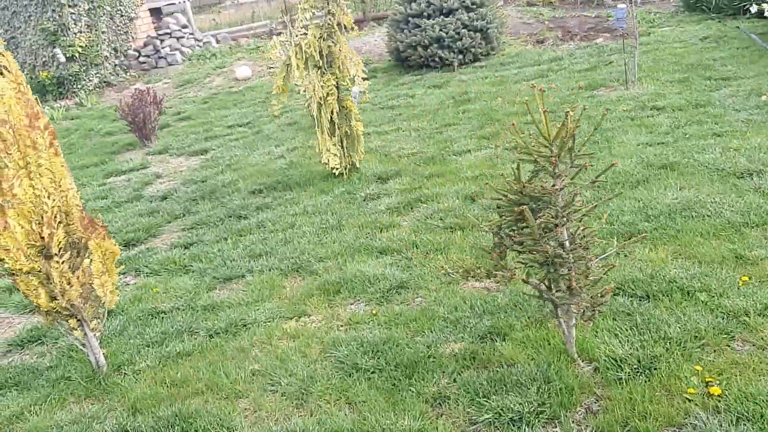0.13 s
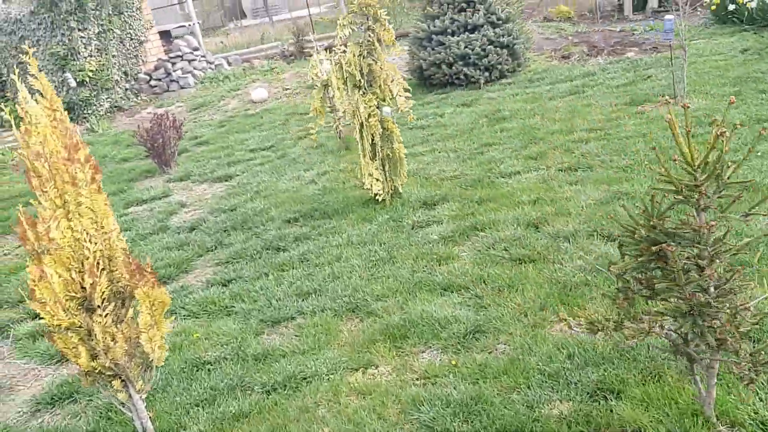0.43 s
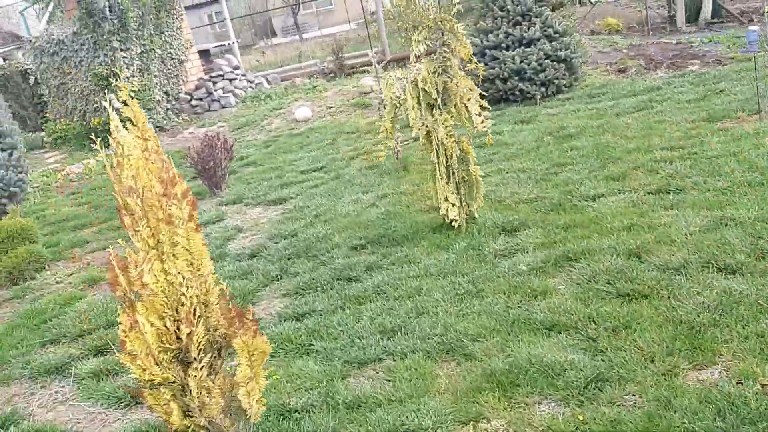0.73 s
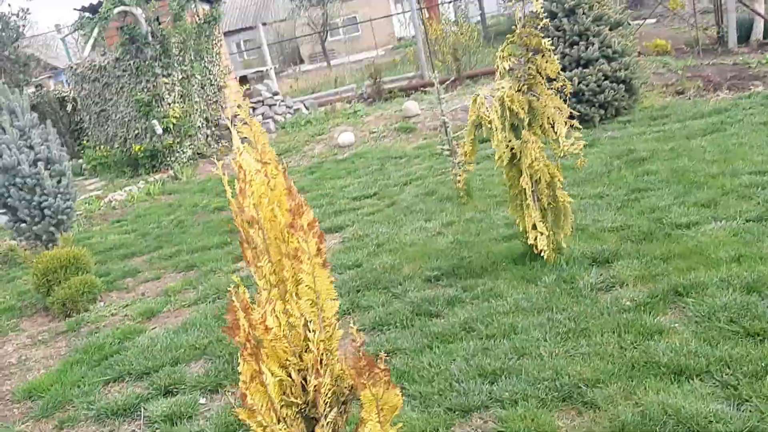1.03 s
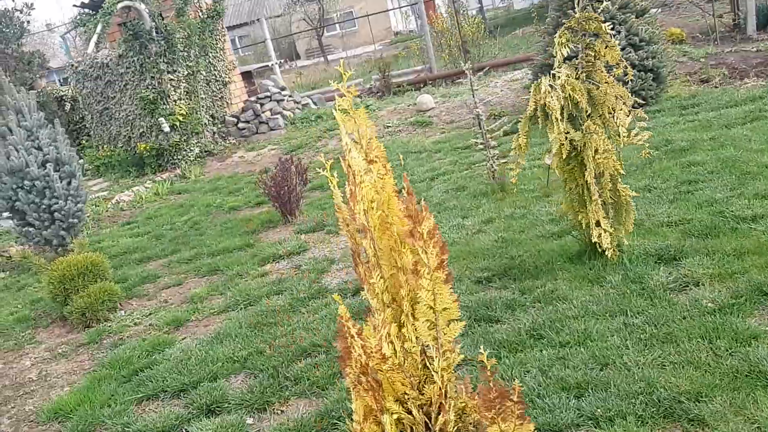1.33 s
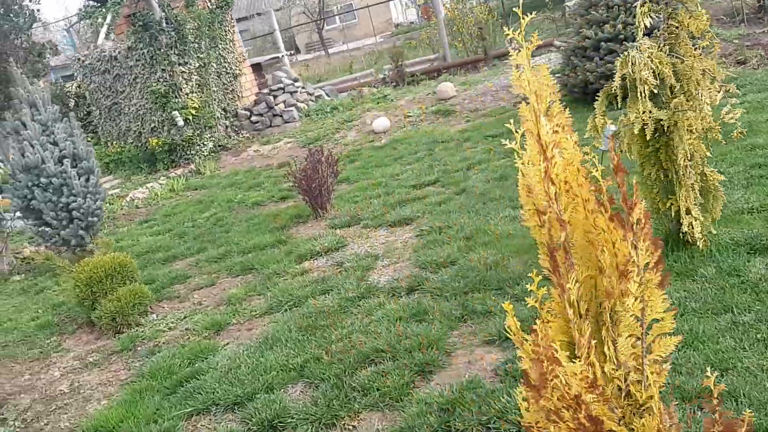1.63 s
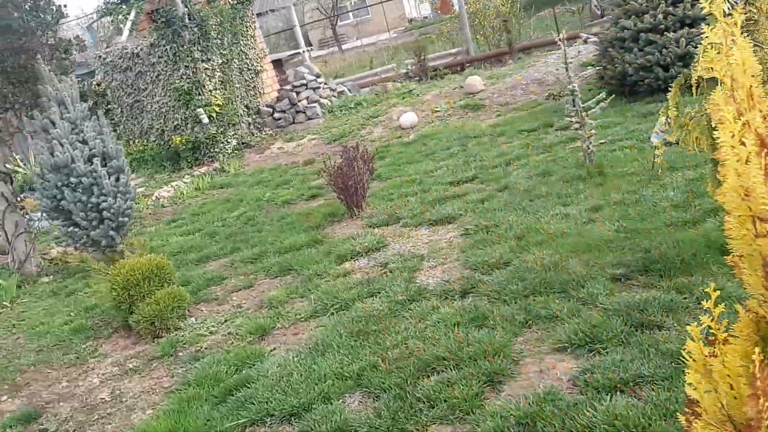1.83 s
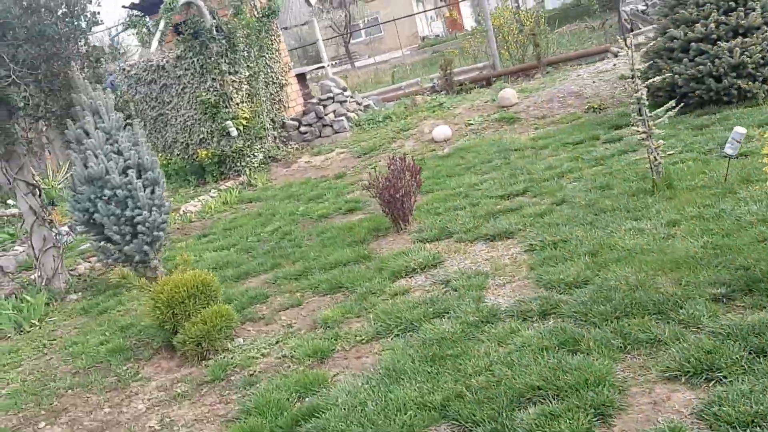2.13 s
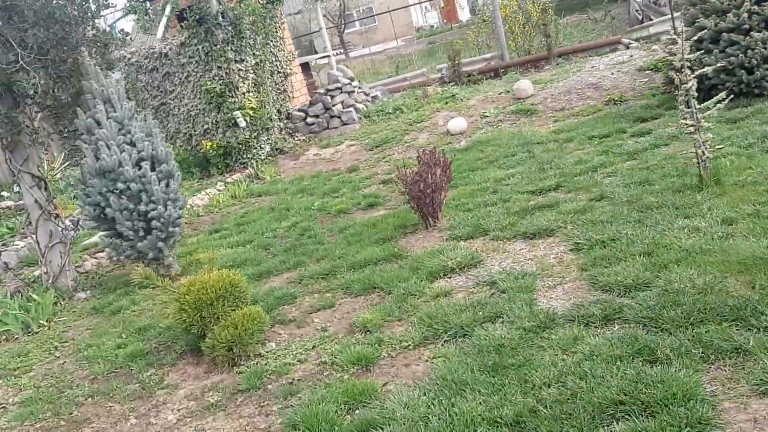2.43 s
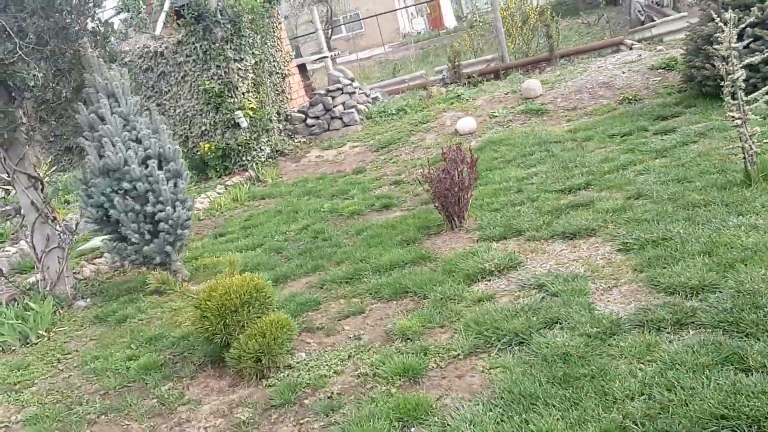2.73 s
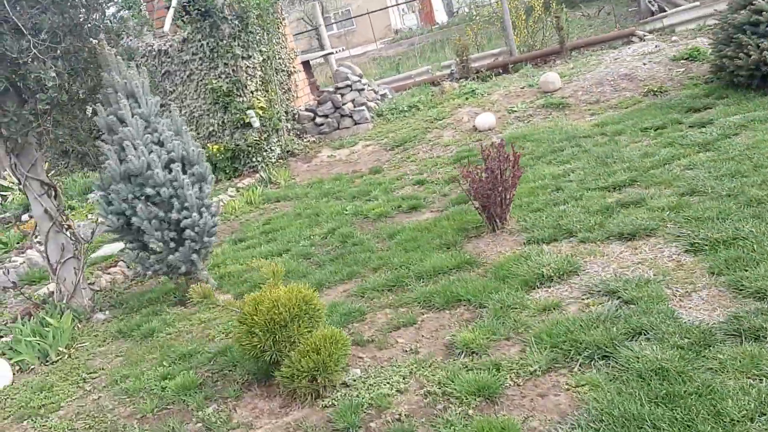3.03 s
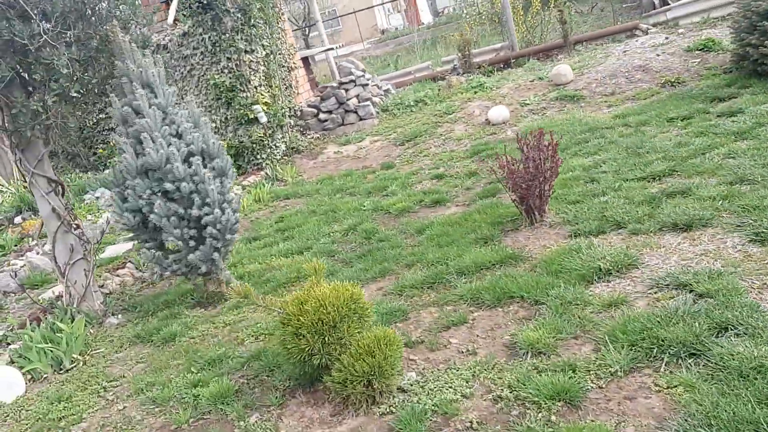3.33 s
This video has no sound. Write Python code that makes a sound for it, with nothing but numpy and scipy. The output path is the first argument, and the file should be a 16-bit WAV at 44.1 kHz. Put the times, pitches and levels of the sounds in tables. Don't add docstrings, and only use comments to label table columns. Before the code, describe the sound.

Soft irregular footsteps swish and crunch over a grassy garden lawn, with a few dry stalks snapping. A sparrow chirps sparsely across the garden, and wind buffets the handheld stereo microphone, strongest on the right.

```python
import sys
import numpy as np
from scipy import signal
from scipy.fft import rfft, irfft
from scipy.io import wavfile
from scipy.ndimage import uniform_filter1d

SR = 44100
rng = np.random.default_rng(int(sys.argv[2]) if len(sys.argv) > 2 else 0)


def store_wav(level_fs):
    pcm = np.round(np.clip(np.atleast_2d(level_fs), -1, 1) * 32767)
    wavfile.write(sys.argv[1], SR, pcm.T.astype(np.int16))


def elevation(decibels):
    levels = np.asarray(decibels, float)
    return 10 ** (levels / 20)


N = 154350


def unit(x):
    return x / np.sqrt(np.mean(x ** 2) + 1e-20)


def at_hz(points):
    hz, value = np.transpose(points)
    grid_hz = np.arange(N // 2 + 1) * SR / N
    return np.interp(np.log(grid_hz + 1), np.log(hz), value)


def colour(x, points):
    return unit(irfft(rfft(x) * elevation(at_hz(points)), N))


def drift(rate_hz):
    r = np.exp(-2 * np.pi * rate_hz / SR)
    wander = signal.lfilter([1], [1, -2 * r, r * r], rng.standard_normal(N + SR))
    return unit(wander[SR:])


def contact(rows, rise_db_s, fall_db_s):
    t, rows = np.arange(N) / SR, np.array(rows)
    start_s, hold_s, level_db = rows[:, :1], rows[:, 1:2], rows[:, 2:]
    rise = (t - start_s) * rise_db_s
    fall = (start_s + hold_s - t) * fall_db_s
    shape_db = np.minimum(0, np.minimum(rise, fall))
    return elevation(2 * level_db).T @ elevation(2 * shape_db)


def grains(power, spectrum, spread_db=2):
    born = rng.random((3, N)) < 8000 / spread_db / SR
    sizes = elevation(spread_db * np.minimum(rng.exponential(1, (3, N)), 4)) * rng.standard_normal((3, N))
    trains = np.array([colour(train, spectrum) for train in born * sizes])
    return np.sqrt(power) * elevation(0.6 * drift(29.0)) * trains


# pitch_hz [Hz], level_db [dB]
RIGHT_PORT = [(900, 2.5), (1700, 13), (3900, 8.5), (4900, -11.5), (7600, -3.5), (9400, 8), (11500, -6.5),
              (16000, -4)]
# pitch_hz [Hz], share [0-1]
SHARED = [(700, 0.9), (2500, 0.51), (8000, 0)]


def ports(shared, left, right):
    hz, left_lag_s = np.arange(N // 2 + 1) * SR / N, .00009
    late = np.exp(-2j * np.pi * hz * left_lag_s)
    share = at_hz(SHARED)
    common, own = np.sqrt(share) * rfft(shared), np.sqrt(1 - share)
    at_left = common * late + own * rfft(left)
    at_right = (common + own * rfft(right)) * elevation(at_hz(RIGHT_PORT))
    return np.array([irfft(at_left, N), irfft(at_right, N)])


# start_s [s], peak_db [dB], pitch_hz [Hz], ring [cycles]
SNAPS = [(0.1851, -40, 2360, 0.57), (0.1967, -45.5, 1430, 1.16), (0.2319, -37, 3000, 0.47),
         (0.3409, -41.5, 2930, 1.1), (.3573, -40, 2500, 0.46), (1.222, -63.5, 776, 6.7),
         (1.638, -36.5, 11000, 1.1), (1.861, -51.5, 7300, 1), (2.1172, -39.5, 8000, 0.73),
         (2.1331, -42, 8000, .8), (3.128, -51, 900, 2.1)]


def snaps():
    t, out = np.arange(N) / SR, np.zeros(N)
    for start_s, peak_db, pitch_hz, ring in SNAPS:
        cycles = np.maximum(t - start_s, 0) * pitch_hz
        swell = 1 - np.exp(-4.0 * cycles / ring)
        fade = np.exp(-cycles / ring)
        out += elevation(peak_db) * fade * swell * 1.32 * np.sin(2 * np.pi * cycles)
    return out


# full_s [s], hold_s [s], turf_db [dB], blades_db [dB],
# rustle_db [dB]
BRUSHES = [(0, 0.0082, -74.5, -76.5, -109.5), (.168, 0.096, -60.5, -56.5, -55.5),
           (.4, 0.027, -92, -66, -61), (.61, 0.056, -79.5, -76, -95.5), (.757, 0.2, -78, -63.5, -63.5),
           (1.04, .1, -75, -70, -64), (1.22, 0.021, -74, -73, -71), (1.385, 0.11, -76, -62.5, -68.5),
           (2.26, 0.19, -81, -87, -85), (1.7, 0.052, -94, -81, -73), (2.577, 0.085, -79, -64, -65.5),
           (3.132, 0.018, -62.5, -97, -85)]
# full_weight_s [s], hold_s [s], turf_db [dB], blades_db [dB], rustle_db [dB]
LANDINGS = [(.33, 0.046, -57.5, -65, -60), (.925, 0.043, -53.5, -67.5, -57),
            (1.515, 0.1, -67.5, -70.5, -59.5), (2.0, 0.066, -76, -68.5, -71.5),
            (2.135, 0.056, -59, -65.5, -60.5), (2.745, 0.0093, -59, -61.5, -55.5),
            (3.18, 0.06, -90, -63, -59.5), (3.33, 0.05, -60.5, -67, -61)]
# full_s [s], hold_s [s], level_db [dB]
SPRINGS = [(.43, 0.083, -73), (.79, 0.013, -69.5), (1.09, 0.023, -71.5), (1.99, 0.0049, -66),
           (3.17, 0.0093, -65)]
# pitch_hz [Hz], level_db [dB per Hz]
TURF = [(250, -21), (750, -1.5), (1100, -8), (1500, -14.5), (2500, -20)]
# pitch_hz [Hz], level_db [dB per Hz]
BLADES = [(700, -25), (1300, -6.5), (2000, -1.5), (2700, -2), (3800, 1.5), (5500, -4.5), (9000, -16)]
# pitch_hz [Hz], level_db [dB per Hz]
RUSTLE = [(2500, -33), (4500, 4.5), (7000, -1), (15500, -2.5)]
# pitch_hz [Hz], level_db [dB per Hz]
SPRING = [(1200, -29), (1650, -16.5), (1950, -6.5), (2350, -16.5), (3200, -23)]


def grass():
    land_rise_db_s, land_fall_db_s, rustle_swell_s = 325, 242, 0.039
    landings = contact(LANDINGS, land_rise_db_s, land_fall_db_s)
    turf, blades, rustle = contact(BRUSHES, 1514, 117) + landings
    keep = np.exp(-1 / (rustle_swell_s * SR))
    rustle = np.minimum(signal.lfilter([1 - keep], [1, -keep], rustle), rustle)
    steps = grains(turf, TURF) + grains(blades, BLADES) + grains(rustle, RUSTLE, spread_db=1)
    steps += snaps()
    springs = grains(contact(SPRINGS, land_rise_db_s, land_fall_db_s)[0], SPRING)
    return ports(*steps) + ports(*springs) * elevation([[4.5], [0]])


# pitch_hz [Hz], level_db [dB per Hz]
AIR = [(100, 13), (500, 11.5), (1500, 7), (4500, 2.5), (6500, 4.5), (9000, 1), (16000, 1.5)]


def air():
    level_db, share, patch_db = -72, 0.11, 0.5
    common, left, right = (colour(rng.standard_normal(N), AIR) for _ in range(3))
    both = rfft(np.sqrt(share) * common + np.sqrt(1 - share) * np.array([left, right]))
    hz = np.arange(N // 2 + 1) * SR / N
    band = np.floor(2 * np.log2(np.maximum(hz, 250) / 250))
    together, out = drift(7.5), np.zeros((2, N))
    for k in np.unique(band):
        patch = patch_db * (drift(0.53) + .5 * together) / (1 + k / 2.0)
        out += elevation(patch) * irfft(both * (band == k), N)
    return elevation(level_db) * out


# pitch_hz [Hz], level_db [dB per Hz]
BUFFET = [(20, -14.5), (80, 1.5), (120, -8), (200, -22.5), (400, -43), (800, -82)]
# pitch_hz [Hz], level_db [dB per Hz]
WHIP = [(60, -14.5), (140, 1.5), (250, -4.5), (400, -19.5), (900, -59.5)]


def wind(gust, puffs):
    t = np.arange(N) / SR
    gust_db = np.interp(t, *np.transpose(gust)) + 2.5 * drift(21.3)
    out = elevation(gust_db) * colour(rng.standard_normal(N), BUFFET)
    whip_db = -7 - 45.5 + 1.97 * (gust_db + 45.5)
    out += elevation(whip_db) * colour(rng.standard_normal(N), WHIP)
    turns = rng.uniform(0, 2 * np.pi, len(puffs))
    for (start_s, peak_db, pitch_hz), turn in zip(puffs, turns):
        near = slice(max(0, int((start_s - .05) * SR)), int((start_s + .05) * SR))
        cycles = (t[near] - start_s) * pitch_hz
        body = np.exp(-(cycles / 0.44) ** 2 / 2) * np.cos(2 * np.pi * cycles + turn)
        edge = np.exp(-(cycles / 0.16) ** 2 / 2) * np.cos(2 * np.pi * 1.16 * cycles + 2 * turn)
        edge_db = -8 + 32 * np.log10(pitch_hz / 130)
        out[near] += elevation(peak_db - 0.5) * (body + elevation(edge_db) * edge)
    return out


# time_s [s], level_db [dB]
LEFT_GUST = [(0, -55.5), (.3, -57.5), (.8, -52), (1.2, -59.5), (1.55, -54), (2.15, -58), (2.6, -53),
             (2.88, -65), (3.05, -57), (3.2, -46.5), (3.28, -51.5), (3.38, -39.5), (3.5, -75)]
# time_s [s], level_db [dB]
RIGHT_GUST = [(0, -57), (.78, -57.5), (.86, -42), (1.0, -46), (1.17, -63.5), (1.32, -44), (1.5, -55.5),
              (1.69, -52), (1.78, -38), (1.99, -44.5), (2.13, -38.5), (2.32, -49), (2.62, -50), (2.84, -55),
              (3.1, -39), (3.26, -50.5), (3.36, -40), (3.5, -34.5)]
# centre_s [s], peak_db [dB], pitch_hz [Hz]
LEFT_PUFFS = [(0.022, -42, 68), (0.279, -33, 79.5), (0.811, -38, 117), (0.959, -36, 87),
              (1.573, -24.5, 134), (2.501, -38, 86.5), (2.743, -38, 107), (2.953, -44, 93),
              (3.075, -37, 104), (3.127, -29, 93), (3.163, -18.5, 114), (3.215, -29, 111),
              (3.245, -27.5, 109), (3.338, -24, 122), (3.391, -35, 94), (3.421, -25, 118),
              (3.099, -38, 89.6), (3.192, -38, 110), (3.299, -38, 104), (3.363, -32, 95),
              (2.981, -40, 80.4)]
# centre_s [s], peak_db [dB], pitch_hz [Hz]
RIGHT_PUFFS = [(0.821, -25, 92), (0.894, -23, 152), (1.012, -27.5, 106), (1.057, -31, 101),
               (1.295, -30, 115), (1.362, -27.5, 122), (1.794, -30, 175), (1.84, -24, 135),
               (1.947, -24, 114), (2.126, -20.5, 124), (2.229, -18.5, 178), (2.359, -27.5, 95),
               (2.42, -31, 110), (2.518, -32, 90), (2.605, -29.5, 114), (2.63, -28, 113),
               (2.735, -35.5, 109), (2.908, -31, 109.6), (3.066, -18, 164), (3.115, -21, 125),
               (3.147, -24.5, 130), (3.342, -22, 110), (3.405, -17, 177), (3.492, -10, 147),
               (.866, -27.5, 204), (.916, -26, 141), (.998, -29, 110), (1.32, -31.5, 138), (1.42, -43, 118),
               (1.755, -37, 86.5), (1.81, -24.5, 156), (1.87, -29, 163), (1.92, -30.5, 125),
               (2.04, -28.5, 115), (2.198, -25.5, 130), (1.305, -37.5, 193), (1.338, -33, 162),
               (1.435, -35.5, 90), (2.068, -29.5, 102), (2.164, -29, 161), (2.221, -22, 106),
               (2.252, -26, 114), (3.0, -29.5, 110), (3.053, -22, 167), (3.075, -29.5, 174),
               (3.195, -35, 136), (3.28, -32.5, 84.6), (3.375, -31, 100), (3.44, -32, 153),
               (3.465, -26, 127), (3.493, -39, 367), (1.728, -33.5, 90), (2.94, -36, 146),
               (2.23, -37.5, 275)]


def breeze():
    return np.array([wind(LEFT_GUST, LEFT_PUFFS), wind(RIGHT_GUST, RIGHT_PUFFS)])


# time_s [s], pitch_hz [Hz], level_db [dB]
FLAT = [(0, 3650, -10), (.005, 4100, -2), (.024, 4300, 0), (.033, 3250, -2), (.042, 3200, -40),
        (.052, 3300, -2), (.065, 3600, 1), (.074, 4200, -2), (.094, 2950, -1)]
# time_s [s], pitch_hz [Hz], level_db [dB]
STEEP = [(0, 3400, -8), (.01, 5050, -1), (.014, 5000, -1), (.023, 3250, -1), (.031, 3000, -40),
         (.04, 2900, -4), (.057, 4200, 0), (.068, 2750, 0), (.077, 3450, -6)]


def chirp(start_s, kind, lead_db):
    t = np.arange(N) / SR
    lead_s, lead_long_s, lead_hz = 0.016, 0.012, 6580
    at_s, pitch_hz, shape_db = np.transpose((FLAT, STEEP)[kind])
    hoarse_hz = 62.7 * drift(176.5)
    glide_hz = uniform_filter1d(np.interp(t - start_s, at_s, pitch_hz), size=90) + hoarse_hz
    edges_s = np.r_[at_s[0] - .002, at_s, at_s[-1] + .003]
    level_db = np.interp(t - start_s, edges_s, np.r_[-80, shape_db, -80], left=-200, right=-200)
    flutter_db = 3.5 * drift(116.0)
    whistle = elevation(level_db + flutter_db) * np.sin(2 * np.pi * np.cumsum(glide_hz) / SR)
    swell = np.exp(-((t - start_s + lead_s) / lead_long_s) ** 2)
    lead = swell * np.sin(2 * np.pi * np.cumsum(lead_hz + 4.7 * hoarse_hz) / SR)
    return whistle + elevation(lead_db) * lead


WALLS = [.013, .026, .05, .095]


def garden_paths(left_db, right_db, garden_db, walls_db):
    t, lag = np.arange(N) / SR, round(.00012 * SR)
    garden_t60_s, wall_smear_s, echo_tilt_db = 0.4, 0.00081, -1
    tail = rng.standard_normal((2, N)) * elevation(-60 * t / garden_t60_s) * (t > .008)
    paths = elevation(garden_db) * tail / np.sqrt(np.sum(tail ** 2, axis=1, keepdims=True))
    for delay_s, wall_db in zip(WALLS, walls_db):
        facets = rng.standard_normal(400) * np.exp(-np.arange(400) / (wall_smear_s * SR))
        facets *= elevation(wall_db) / np.sqrt(np.sum(facets ** 2))
        first = int(delay_s * SR)
        for port, start in enumerate([first + lag, first]):
            paths[port, start:start + len(facets)] += facets
    tilt = at_hz([(3000, -echo_tilt_db), (5000, echo_tilt_db)])
    paths = irfft(rfft(paths) * elevation(tilt), N)
    paths[[0, 1], [lag // 2, 0]] = elevation([left_db, right_db])
    return paths


# start_s [s], kind [0 flat-topped, 1 steep]
CHIRPS = [
    (.1595, 1),
    (.7445, 0),
    (1.381, 1),
    (2.59, 0),
    (3.234, 0),
]
# level_db [dB], left_db [dB], right_db [dB], garden_db [dB], lead_db [dB]
HEARD = [(-57, 2, -3, 2, -19), (-60.5, -1.5, -4, 3, -18.5), (-57, -6, -22, 0, -16.5),
         (-62.5, -5, -1, 2, -16.5), (-61, -1.5, 0, 2, -11)]
# wall_1_db [dB], wall_2_db [dB], wall_3_db [dB], wall_4_db [dB]
ANSWERS = [(-11, -17, -7, -14), (-7, -14, 4, -17), (-16, -10, -4, -33), (4, -13, -10, -20),
           (-28, -4, -8, -13)]


def sparrow():
    out = np.zeros((2, N))
    for (start_s, kind), heard, walls_db in zip(CHIRPS, HEARD, ANSWERS):
        level_db, left_db, right_db, garden_db, lead_db = heard
        song = chirp(start_s, kind, lead_db)
        paths = garden_paths(left_db, right_db, garden_db, walls_db)
        out += elevation(level_db + 7.5) * signal.fftconvolve(song[None], paths)[:, :N]
    return out


def scene():
    return grass() + air() + breeze() + sparrow()


def low_pass(x):
    return signal.sosfilt(signal.butter(12, 16750, fs=SR, output="sos"), x)


def record(dry):
    low_cut = signal.sosfilt(signal.butter(2, 35.0, "high", fs=SR, output="sos"), dry)
    top_cut = signal.sosfilt(signal.cheby2(14, 70, 16700, fs=SR, output="sos"), low_cut)
    return low_pass(top_cut)


dry = scene()
out = record(dry)
store_wav(out)
```